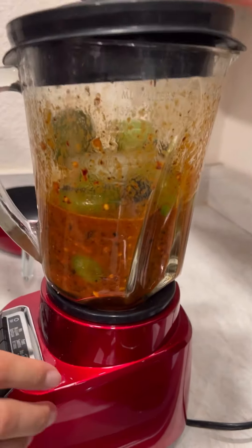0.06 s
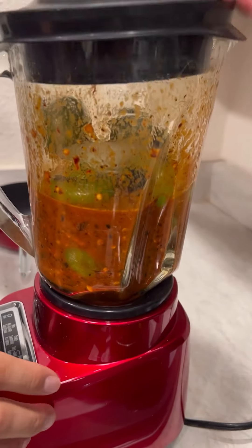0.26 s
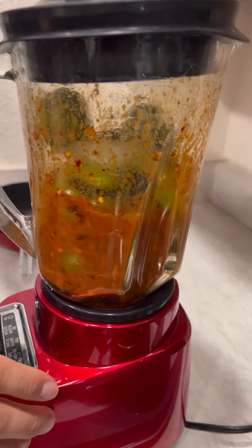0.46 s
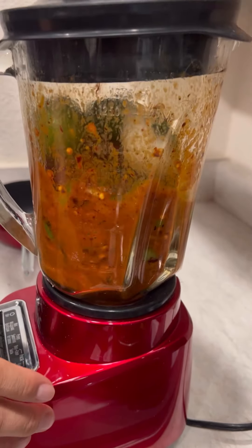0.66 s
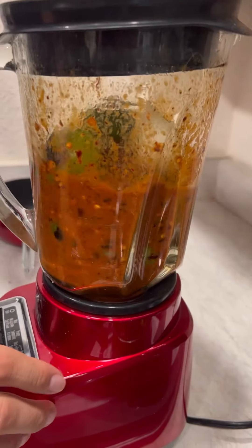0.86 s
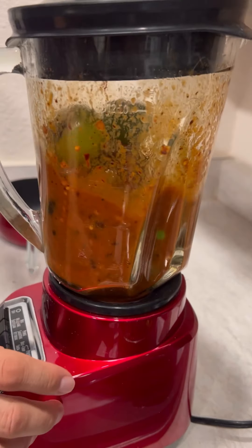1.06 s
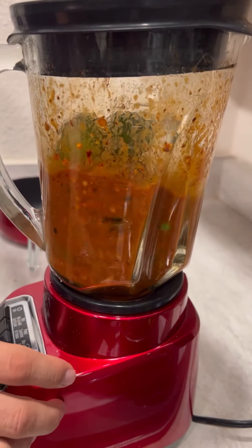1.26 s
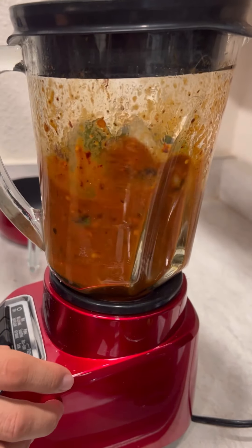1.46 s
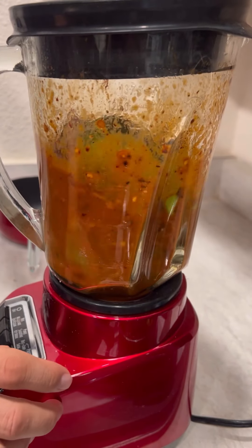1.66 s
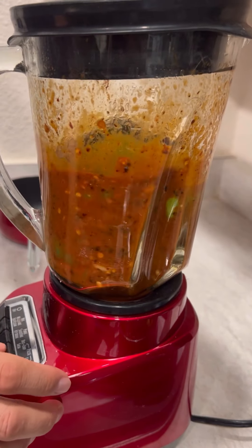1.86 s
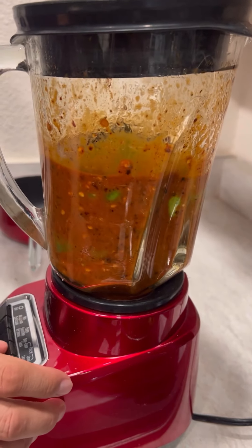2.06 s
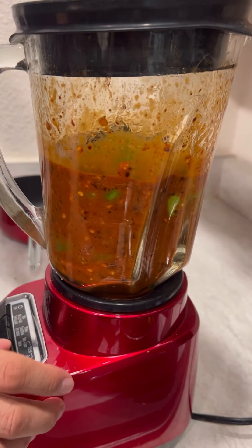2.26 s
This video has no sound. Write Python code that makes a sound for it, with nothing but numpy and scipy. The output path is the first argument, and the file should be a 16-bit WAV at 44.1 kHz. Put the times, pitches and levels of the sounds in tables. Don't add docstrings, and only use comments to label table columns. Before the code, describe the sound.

A blender, heard close in a small quiet kitchen. Plastic lid clicks at 0.05 and sharper snaps with a hollow thump near 0.2 seconds. The motor kicks in hard at 0.43, grinding briefly and fading by 0.8. A second thudding burst runs 0.86 to 1.13. From 1.2 it growls longer, chunks cracking against glass, then slows after 1.9, with a faint falling squeak at 2.1.

```python
import sys
import numpy as np
from scipy import signal
from scipy.fft import rfft, irfft, next_fast_len
from scipy.io import wavfile
from scipy.ndimage import uniform_filter1d, map_coordinates

SR = 44100
rng = np.random.default_rng(int(sys.argv[2]) if len(sys.argv) > 2 else 0)


def elevation(decibels):
    levels = np.asarray(decibels, float)
    return 10 ** (levels / 20)


def to_wav(sig):
    pcm = np.clip(np.atleast_2d(sig), -1, 1) * 32767
    pcm = np.round(pcm).astype(np.int16)
    wavfile.write(sys.argv[1], SR, pcm.T)


N = 101429

# t/s, level/dB, t60/s
MOTOR_KICKS = [
    (.4255, -1, 0.03),
    (.8565, -32, 0.04),
    (1.2085, -28, 0.077),
]
# f/Hz, density/dB per Hz
SAUCE_COLOUR = [(76, -62), (130, -7.5), (491, -10.5), (735, -12.5), (994, -11.5), (2010, -10.5),
                (2610, -22.5), (8740, -33.5), (16000, -84)]
CLICK_RISE_S = .0004


def unit(x):
    return x / np.sqrt(np.mean(x ** 2) + 1e-20)


def along(points, hz):
    f, v = np.transpose(points)
    return np.interp(np.log(hz + 1), np.log(f + 1), v)


def curve(rows):
    return np.interp(np.arange(N) / SR, *np.transpose(rows))


def wobble(rate):
    return map_coordinates(rng.standard_normal(N // 50), [np.arange(N) * rate / SR])


def filtered(x, response):
    m = next_fast_len(N + SR // 2)
    return irfft(rfft(x, m) * response(np.fft.rfftfreq(m, 1 / SR)), m)[..., :N]


def resonant(x, peaks):
    def response(f):
        total = 0
        for k, (centre, width, db) in enumerate(peaks):
            damping = 1j * f * width
            total = total + (-1) ** k * elevation(db) * damping / (centre * centre - f * f + damping)
        return total
    return filtered(x, response)


def coloured(spectrum):
    return lambda x: filtered(x, lambda hz: elevation(along(spectrum, hz)))


def noise(spectrum):
    return unit(coloured(spectrum)(rng.standard_normal(N)))


def knocks(per_s, spread_db):
    chance, sign, size = rng.random(N), rng.standard_normal(N), rng.exponential(size=N)
    return unit((chance < per_s / SR) * np.sign(sign) * elevation(spread_db * np.minimum(size, 4)))


def bursts(rows, rise_s):
    t = np.arange(N) / SR
    total = 0
    for s, db, t60 in rows:
        rise = -np.expm1(-np.maximum(t - s, 0) / rise_s)
        total = total + elevation(db - 60 * np.abs(t - s) / t60) * rise
    return total


def struck(envelope, *paths):
    white = rng.standard_normal((len(paths), N))
    return sum(elevation(db) * path(envelope * w) / np.std(path(w)) for (db, path), w in zip(paths, white))


def patchy(x, depth_db):
    z = signal.stft(x, nperseg=256)[2]
    field = rng.standard_normal(z.shape)
    field = uniform_filter1d(uniform_filter1d(field, 4, 0), 6, 1)
    return signal.istft(z * elevation(depth_db * unit(field)), nperseg=256)[1][:N]


def running():
    return np.arange(N) > MOTOR_KICKS[0][0] * SR


def lid():
    # t/s, peak/dB, t60/s, f/Hz, thump/dB
    clicks = [(0.0378, -18.5, 0.022, 1920, -32.5), (0.0461, -24.5, 0.051, 2060, -59),
              (0.0595, -14, 0.039, 2600, -35), (0.1985, -23, 0.049, 1700, -24.5),
              (0.2067, -16.5, 0.06, 2300, -47), (0.2172, -17, 0.024, 3170, -21),
              (0.2402, -14.5, 0.013, 960, -22.5), (0.2484, -23.5, 0.047, 1700, -27.5),
              (0.301, -41, 0.25, 1500, -49), (0.404, -44, 0.078, 4000, -33), (1.16, -45.5, 0.03, 5300, -46),
              (2.246, -45, 0.045, 3000, -54)]
    # f/Hz, density/dB per Hz
    plastic = [(300, 12.5), (700, 10), (2300, 2), (4500, -8), (7200, -15), (9500, -34), (16000, -56)]
    # f/Hz, width/Hz, level/dB
    cavity = [(58, 5.3, 12.5), (131, 61, -4.5), (210, 30, 2.5), (310, 63, -9.5)]
    out, push = np.zeros(N), np.zeros(N)
    for s, db, t60, hz, thump_db in clicks:
        peak = [(hz, hz / 2.2, 0)]
        tilt_db = 14.5 * (s > .19)
        tone = [(f, level + tilt_db * max(np.log2(f / 4000), 0)) for f, level in plastic]
        ring = lambda x: resonant(resonant(x, peak), peak)
        envelope = bursts([(s, db - 7.5, t60)], CLICK_RISE_S)
        out += struck(envelope, (-1.5, ring), (-1.2, coloured(tone)))
        push[round(s * SR)] = elevation(thump_db + 45.0)
    return out + resonant(resonant(push, cavity), [(148, 260, 0.016)])


def drags():
    # t/s, f/Hz, level/dB, length/s
    scrapes = [(0.567, 154, -24.5, 0.021), (0.575, 1437, -32, 0.02), (0.968, 2620, -27, 0.0096),
               (0.976, 310, -33.5, 0.097), (1.31, 307, -42, 0.043), (1.676, 476, -21, 0.029),
               (1.692, 396, -23, 0.038), (1.779, 1700, -26, 0.012), (1.826, 2523, -27, 0.039),
               (2.133, 996, -38.5, 0.011), (0.69, 277, -37, 0.058), (2.085, 2600, -40, 0.005),
               (2.145, 2720, -46, .005), (0.331, 310, -41.5, .01), (.368, 210, -35, 0.017),
               (0.251, 226.4, -27, 0.019)]
    t, out = np.arange(N) / SR, np.zeros(N)
    for s, hz, db, length in scrapes:
        narrow = resonant(rng.standard_normal(N), [(hz, hz / 18, 0)])
        mode = unit(resonant(narrow, [(hz, hz / 4, 0)]))
        out += elevation(db) * np.exp(-((t - s) / length) ** 2) * mode
    return out


def base():
    # t/s, rocking of the base/dB, motor load/dB
    hum_levels = [(0.43, -31, -32), (0.528, -26, -36), (0.574, -21.5, -38), (0.82, -44, -42),
                  (1.022, -24, -23.5), (1.136, -36, -36), (1.146, -59, -55), (1.205, -60, -50),
                  (1.246, -26.5, -28.5), (1.512, -27.5, -19), (1.542, -21, -29), (1.688, -41, -22.5),
                  (1.776, -20.5, -31.5), (2.136, -36.5, -38.5), (2.3, -44, -62)]
    # t/s, f/Hz
    spin = [(.43, 118), (.86, 105.2), (1.0, 118), (1.14, 101), (1.24, 117.4), (1.37, 114.3), (1.43, 120),
            (1.53, 109.3), (1.7, 117.6), (1.85, 119.2), (1.95, 92.6), (2.2, 99.5)]
    # f/Hz, width/Hz, level/dB
    counter = [(63, 25, 0)]
    # f/Hz, width/Hz, level/dB
    windings = [(114.6, 62, 0)]
    # f/Hz, density/dB per Hz
    kick_colour = [(60, -39), (150, 2), (450, -0.5), (1250, -8.5), (1950, -6.5), (2500, -22), (3800, -17.5),
                   (6000, -24), (16000, -42.5)]
    s, rock_db, load_db = np.transpose(hum_levels)
    ring = lambda peak: unit(resonant(resonant(rng.standard_normal(N), peak), peak))
    rocking = elevation(curve(np.c_[s, rock_db])) * ring(counter)
    pitch = curve(spin) * (1 + 0.016 * wobble(11.6))
    tone = np.sin(2 * np.pi * np.cumsum(pitch) / SR)
    motor = elevation(curve(np.c_[s, load_db])) * unit(tone + 0.53 * ring(windings))
    kicks = struck(bursts(MOTOR_KICKS, rise_s=0.0029), (0, coloured(kick_colour)))
    return running() * (rocking + motor) + kicks


def effort_db():
    # t/s, level/dB
    starts = [
        [(.43, -22), (.46, -30.5), (.52, -23), (.575, -19.5), (.61, -27.5), (.715, -37), (.73, -41), (.8, -53),
         (.855, -55)],
        [(.858, -30.5), (.885, -29.5), (.95, -18), (1.03, -24), (1.055, -30), (1.1, -35.5), (1.138, -53),
         (1.206, -50)],
        [(1.209, -31.5), (1.33, -18.5), (1.39, -22.5), (1.716, -19.5), (1.74, -22.5), (1.84, -19.5),
         (1.89, -23), (2.02, -32), (2.24, -55)],
    ]
    return curve(np.concatenate(starts))


def blades():
    # f/Hz, width/Hz, level/dB
    body = [(310, 94, -7.5), (511.5, 70, -2.5), (1016.4, 49, -1.5), (1451, 72, -7.5), (1700, 67, -8.5),
            (2290, 38, -46), (2460, 180, -24), (2620, 53, -11.5)]
    # f/Hz, width/Hz, level/dB
    ridge = (9700, 250, 5)
    ridge_hz, ridge_width, ridge_db = ridge

    def dull():
        return unit(filtered(knocks(300, spread_db=1.5), lambda hz: 1 / (1 + 1j * hz / 853) ** 2))

    def stir():
        return patchy(elevation(2.5 * wobble(60)) * rng.standard_normal(N), depth_db=2.5)

    def colour(hz):
        bump = np.exp(-((hz - ridge_hz) / ridge_width) ** 2)
        return elevation(along(SAUCE_COLOUR, hz) + ridge_db * bump)

    broad = unit(filtered(stir() + 0.82 * dull(), colour))
    rung = unit(resonant(stir() + .5 * dull(), body))
    return running() * elevation(effort_db() + 1 + 0.38 * wobble(12.1)) * unit(broad + rung)


def thuds():
    # t/s, peak/dB, f/Hz
    catches = [(0.465, -12.5, 985), (0.504, -26, 306), (0.53, -19, 406), (0.559, -10, 470),
               (0.579, -12, 414), (0.639, -25, 495), (0.661, -18, 997), (0.704, -20, 467),
               (0.861, -20.5, 523), (0.897, -11.5, 370), (0.927, -9, 444), (0.952, -5, 534),
               (0.977, -4, 444), (1.003, -5, 1017), (1.017, -11, 452), (1.069, -16, 324), (1.21, -16, 546),
               (1.252, -16.5, 1040), (1.275, -15, 336), (1.295, -10.5, 530), (1.327, -11, 510),
               (1.369, -10, 966), (1.398, -3.5, 477), (1.434, -6, 517), (1.45, -11.5, 337),
               (1.463, -10, 495), (1.493, -13, 370), (1.524, -16, 377), (1.556, -9.5, 441),
               (1.583, -8, 450), (1.617, -9, 530), (1.646, -3, 490), (1.667, -11, 454), (1.696, -4.5, 448),
               (1.704, -11.5, 460), (1.751, -13.5, 501), (1.767, -12, 458), (1.799, -15, 334),
               (1.829, -20, 510), (1.897, -10, 490), (1.956, -23, 345), (2.01, -15.5, 1057),
               (2.081, -21.5, 988)]
    thud_db, t60_s, rise_s = -6.5, 0.059, 0.00078
    t, out = np.arange(N) / SR, np.zeros(N)
    for s, db, hz in catches:
        part = slice(round(s * SR), round(s * SR) + 4000)
        u = t[part] - t[part][0]
        envelope = elevation(db + thud_db - 60 * u / t60_s) * -np.expm1(-u / rise_s)
        out[part] += envelope * np.sin(2 * np.pi * (hz * u + rng.random()))
    grit = bursts([(s, db + thud_db - 7, t60_s / 2) for s, db, hz in catches], rise_s)
    return out + struck(grit, (0, coloured(SAUCE_COLOUR)))


def chops():
    # t/s, peak/dB
    hits = [(0.5092, -14), (0.564, -6.5), (0.578, -11), (0.605, -17), (0.697, -23), (0.8624, -60),
            (0.8948, -53), (0.9233, -50), (0.9607, -16.5), (0.994, -33), (1.2076, -39), (1.2256, -51),
            (1.246, -17), (1.272, -12.5), (1.2975, -12), (1.3323, -10), (1.3861, -4), (1.4308, -7.5),
            (1.461, -7.5), (1.473, -2.5), (1.576, -19), (1.5922, -4.5), (1.6157, -20), (1.6352, -1),
            (1.651, -9), (1.668, -17), (1.6757, -6.5), (1.693, -13), (1.6998, -10), (1.71, -14),
            (1.714, -17), (1.721, -15), (1.732, -16), (1.751, -9), (1.7733, -6), (1.807, -6), (1.817, -7.5),
            (1.83, -6), (1.8417, -2), (1.861, -9), (1.889, -13), (1.9162, -10), (2.0124, -24),
            (2.0821, -30)]
    # f/Hz, width/Hz, level/dB
    jar = [(2600, 150, 8), (3780, 207, 6), (4380, 410, 2), (4930, 300, -15), (5780, 180, -4),
           (6530, 140, -7)]
    # f/Hz, level/dB
    crack = [(1500, -53), (2500, -7), (5000, -1.5), (10000, -10.5), (16000, -35)]
    large = bursts([(s, db - 16, .02) for s, db in hits], CLICK_RISE_S)
    decay = elevation(-60 * np.arange(600) / (.018 * SR))
    ticks = signal.fftconvolve(np.abs(knocks(440, spread_db=3.5)), decay)[:N]
    small = running() * elevation(effort_db() - 20.5) * (unit(ticks) + 0.46)
    return struck(large + small, (0, lambda x: resonant(x, jar)), (-4.5, coloured(crack)))


def squeak():
    # t/s, f/Hz, level/dB
    glide = [(0, 1815, -72), (.028, 1835, -59), (.045, 1810, -65), (.06, 1660, -63), (.075, 1560, -62),
             (.085, 1410, -62), (.098, 1310, -66), (.11, 1250, -85)]
    # t/s, level/dB
    stops = [
        (.699, -3),
        (2.12, 0),
    ]
    # multiple, level/dB
    orders = [(1, 4), (2, 0), (3, 4), (4, 2)]
    # f/Hz, level/dB
    housing = [(3000, -12), (3650, 2), (4200, 3), (4900, -1), (5500, 1), (5650, -9), (6350, 7), (7000, -2),
               (7300, 0)]
    out, (t, hz, level) = np.zeros(N), np.transpose(glide)
    for s, db in stops:
        pitch = curve(np.c_[t + s, hz]) * (1 + 0.0071 * wobble(520))
        outside = np.abs(np.arange(N) / SR - s - t[-1] / 2) > t[-1] / 2
        gain_db = curve(np.c_[t + s, level]) + db + 3.8 * wobble(220) - 99 * outside
        for k, rel_db in orders:
            tone = np.sin(2 * np.pi * k * np.cumsum(pitch) / SR)
            out += elevation(gain_db + rel_db + along(housing, k * pitch)) * tone
    return out


def room(x):
    # f/Hz, t60/s
    walls = [(200, 0.28), (2000, 0.093), (10000, 0.17)]
    hz, t, z = signal.stft(rng.standard_normal(SR // 2), SR, nperseg=256)
    tail = signal.istft(z * elevation(-60 * t / along(walls, hz)[:, None]), SR, nperseg=256)[1]
    return signal.fftconvolve(np.pad(x, (200, 0)), tail / np.linalg.norm(tail))[:N]


def stereo(x):
    # f/Hz, level/dB
    side_level = [(60, -39), (200, -38), (380, -22), (1100, -18.5), (1800, -28.5), (2500, -11), (5980, -7),
                  (15000, -0.5)]
    # f/Hz, phase/rad
    side_phase = [(3000, 1.5), (4400, .6), (5600, -1.5)]
    steady_share = .5
    z = signal.stft(x, nperseg=128)[2]
    scrambled = z * np.exp(2j * np.pi * rng.random(z.shape))
    other = signal.istft(scrambled, nperseg=128)[1][:N] * 1.94

    def steady(hz):
        return elevation(along(side_level, hz)) * np.sqrt(steady_share) * np.exp(1j * along(side_phase, hz))

    def scatter(hz):
        return elevation(along(side_level, hz)) * np.sqrt(1 - steady_share)

    side = filtered(x, steady) + filtered(other, scatter)
    return np.array([x + side, x - side])


def scene():
    # f/Hz, density/dB per Hz
    hush = [(30, -12), (60, 4.5), (165, -13), (300, -10.5), (600, -16.5), (2400, -27.5), (7500, -45.5),
            (10500, -67)]
    near = lid() + drags() + base() + blades() + thuds() + chops() + squeak()
    floor = elevation(-43 + 1.5 * wobble(12)) * noise(hush)
    return stereo(near + elevation(-10) * room(near) + floor)


def low_pass(x):
    return signal.sosfilt(signal.butter(12, 16620, fs=SR, output="sos"), x)


def record(dry):
    soft = dry / (1 + np.abs(dry / .65) ** 4) ** .25
    kept = filtered(soft, lambda hz: (hz < 15800) * hz ** 2 / (hz ** 2 + 50 ** 2))
    return low_pass(kept)


dry = scene()
out = record(dry)
to_wav(out)
```